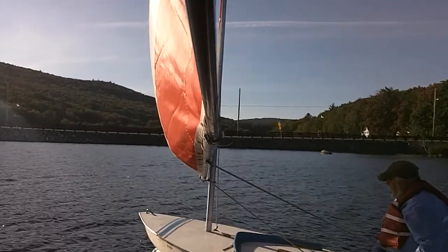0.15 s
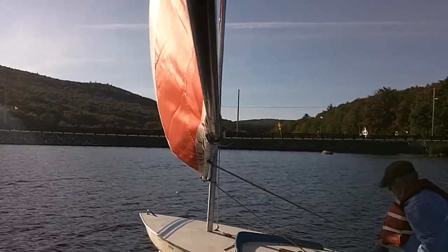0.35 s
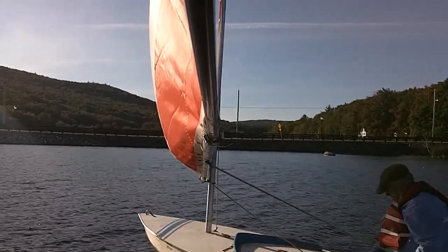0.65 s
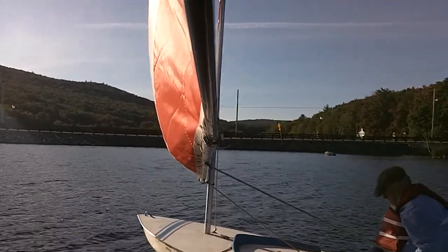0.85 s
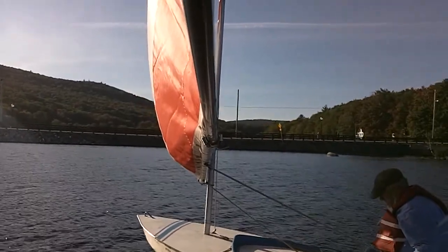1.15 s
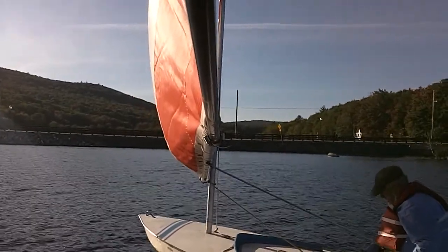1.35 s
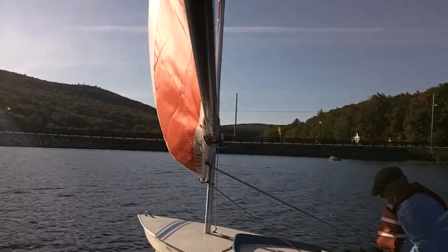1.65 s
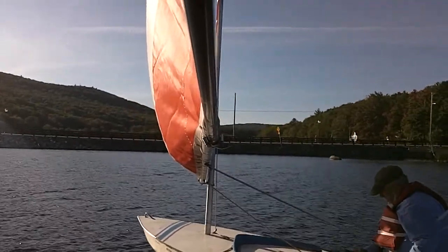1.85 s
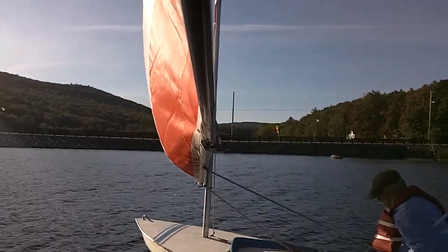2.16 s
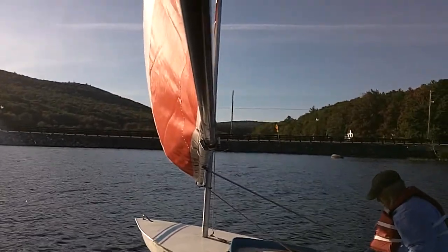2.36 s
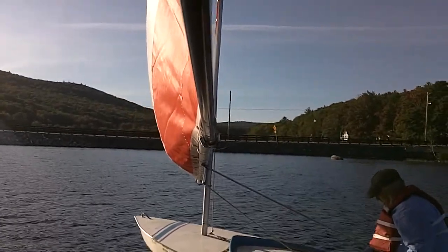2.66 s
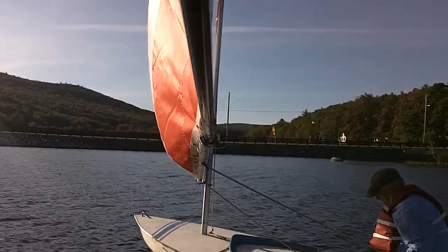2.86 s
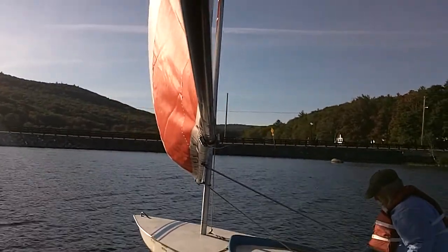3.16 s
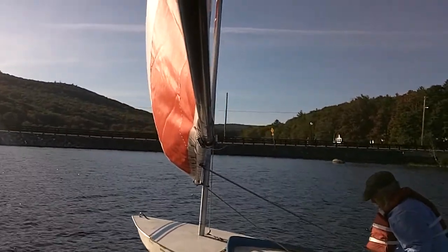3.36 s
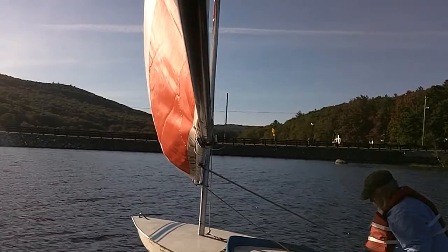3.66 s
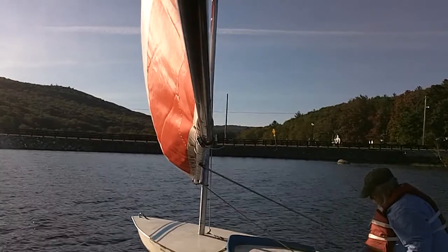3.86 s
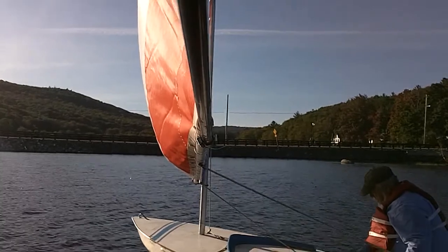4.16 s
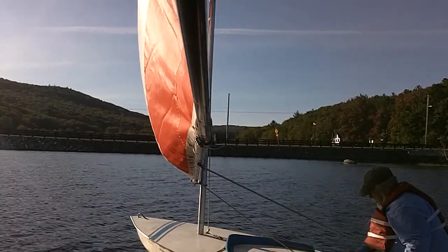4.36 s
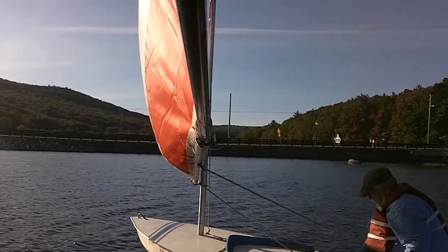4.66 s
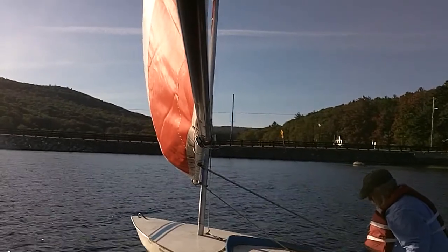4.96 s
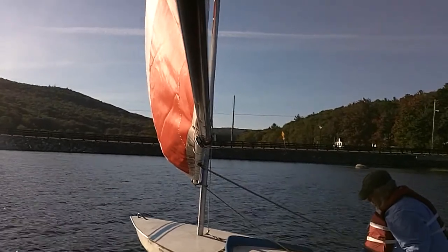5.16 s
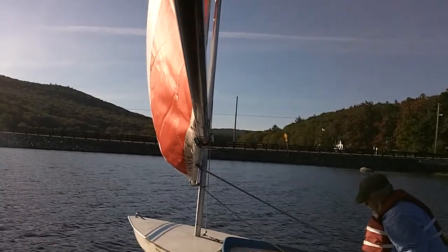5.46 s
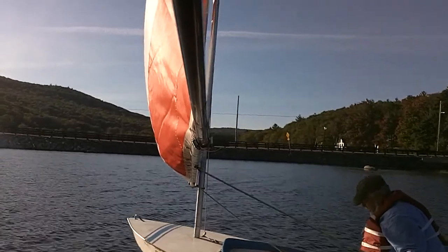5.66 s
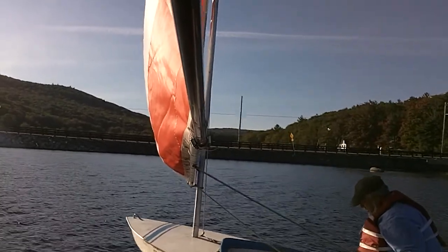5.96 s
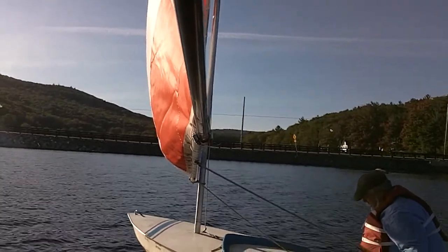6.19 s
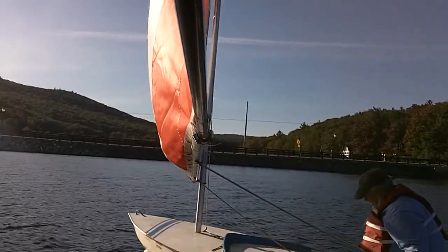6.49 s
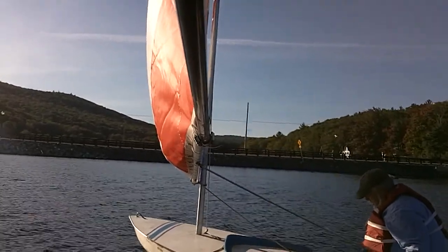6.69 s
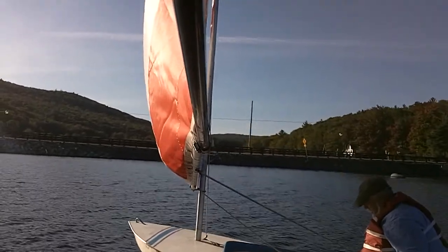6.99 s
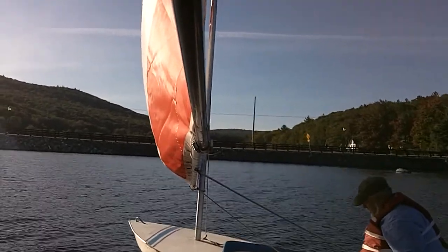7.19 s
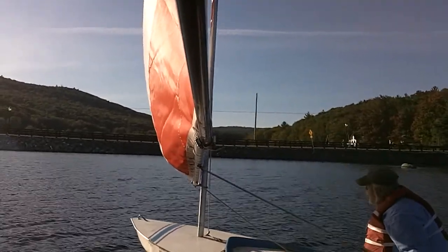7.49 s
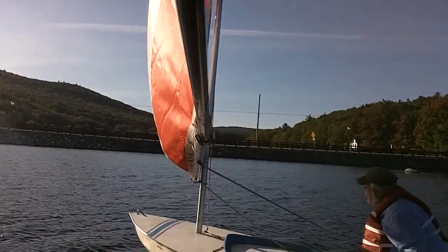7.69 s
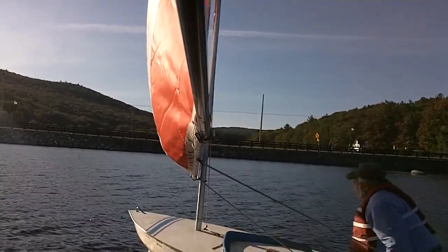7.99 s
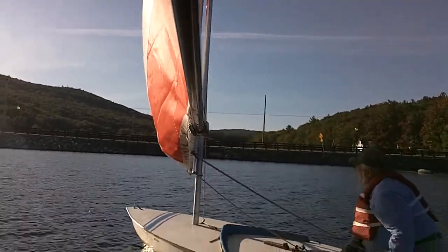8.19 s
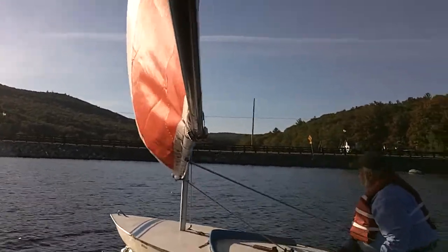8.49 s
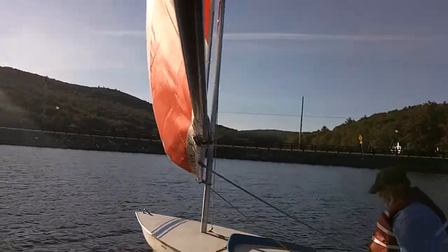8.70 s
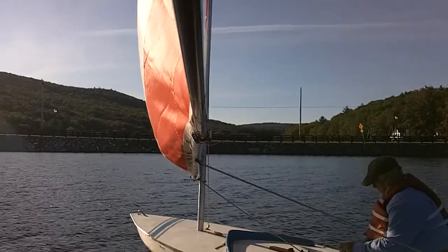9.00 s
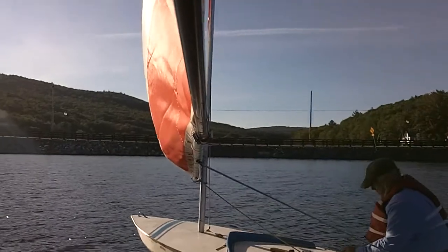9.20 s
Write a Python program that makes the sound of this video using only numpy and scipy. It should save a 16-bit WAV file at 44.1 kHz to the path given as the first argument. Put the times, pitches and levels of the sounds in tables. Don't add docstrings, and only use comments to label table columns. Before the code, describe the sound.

Close, dry outdoor sound from aboard a sailing dinghy: small wavelets lap quickly against the hull over constant gurgling and soft fizz. Glugging bubbles and crisp drops scatter throughout. Low wind rumble pushes the microphone in lumps, easing and returning, with a strong cluster around seven seconds. The flow calms mid-way, slackens briefly, then surges with heavier slosh and deeper glugs towards the end. High treble comes and goes in patches.

```python
import sys
import numpy as np
from scipy import signal
from scipy.fft import rfft, irfft, next_fast_len
from scipy.io import wavfile
from scipy.ndimage import uniform_filter1d

SR = 44100
rng = np.random.default_rng(int(sys.argv[2]) if len(sys.argv) > 2 else 0)


def gain_from_db(level_db):
    decades = np.asarray(level_db, float) / 20
    return 10 ** decades


def dump_mix(stems):
    frames = np.atleast_2d(stems).T
    limited = np.clip(frames, -1, 1)
    pcm = np.round(limited * 32767).astype(np.int16)
    wavfile.write(sys.argv[1], SR, pcm)


N = 411894
COARSE = 40


def rms_one(x):
    return x / np.sqrt(np.mean(x ** 2) + 1e-20)


def per_sample(coarse):
    return np.interp(np.arange(N) / COARSE, np.arange(len(coarse)), coarse)


def in_time(rows):
    s, *columns = np.transpose(rows)
    return [np.interp(np.arange(N) / SR, s, column) for column in columns]


def swells(s, rise_s, fall_s):
    late = np.arange(0, N, COARSE) / SR - s[:, None]
    return np.exp(-0.5 * (late / np.where(late < 0, rise_s, fall_s)) ** 2)


def drift(rate_hz):
    memory = np.exp(-2 * np.pi * rate_hz * COARSE / SR)
    noise = rng.standard_normal(N // COARSE + 2002)
    slow = signal.lfilter([1], [1, -2 * memory, memory ** 2], noise)[2000:]
    return per_sample(rms_one(slow))


def colour(x, points):
    hz, db = np.transpose(points)
    size = next_fast_len(N)
    bins = np.maximum(np.fft.rfftfreq(size, 1 / SR), 1)
    gain = gain_from_db(np.interp(np.log(bins), np.log(hz), db))
    return irfft(rfft(x, size) * gain, size)[:N]


def split(x, hz):
    low = signal.butter(4, hz, "low", fs=SR, output="sos")
    high = signal.butter(4, hz, "high", fs=SR, output="sos")
    return signal.sosfilt(low, x), signal.sosfilt(high, x)


def evened(x, share):
    swelling = uniform_filter1d(uniform_filter1d(x ** 2, size=900), size=900)
    return rms_one(x / (swelling + 1e-20) ** (share / 2))


def bubbles(start_s, height, hz, cycles, rise, size, swell_turns=1.76):
    turns = np.arange(size) / SR * hz[:, None]
    life = turns / np.maximum(cycles, 1)[:, None]
    swell = np.minimum(turns / swell_turns, 1) * np.exp(-np.log(1000) * life)
    ring = np.sin(2 * np.pi * turns * (1 + rise[:, None] * life))
    waves = height[:, None] * swell * ring
    at = (start_s * SR).astype(int)[:, None] + np.arange(size)
    return np.bincount(at.ravel(), waves.ravel(), N + size)[:N]


def swarm(low_hz, high_hz, cycles, spread_db, count, size):
    when, pitch, strength, length, climb = rng.random((count, 5)).T
    height = gain_from_db(spread_db * np.minimum(-np.log(1 - strength), 2.8))
    hz = low_hz + (high_hz - low_hz) * pitch
    return rms_one(bubbles(when * N / SR, height, hz, cycles * (0.5 + length), 0.918 * climb ** 2, size))


def hiss(low_hz, high_hz, patchy_db):
    edges = np.geomspace(low_hz, high_hz, 7)
    together = drift(34.0)
    out = 0
    for low, high in zip(edges, edges[1:]):
        band_pass = signal.butter(2, [low, high], "band", fs=SR, output="sos")
        band = signal.sosfilt(band_pass, rng.standard_normal(N))
        out = out + band * gain_from_db(patchy_db * (0.91 * together + drift(33.0)))
    return rms_one(out)


# (time [s], level [dB])
WATER_FLOW = [
    (0, -55),
    (1.0, -50.5),
    (2.1, -51.5),
    (3.2, -52),
    (4.3, -53),
    (6.0, -52),
    (6.9, -51),
    (7.6, -55),
    (8.1, -49),
    (9.34, -50.5),
]
# (time [s], gurgle rise [dB], fizz rise [dB], slosh rise [dB])
HULL_LAPS = [(.19, 6, 6.5, 8.5), (.48, 1.5, 5, -1), (.87, 3.5, 3.5, 2), (1.25, -0.5, -0.5, 2),
             (1.62, 1, 0.5, 1), (2.41, 1.5, 3, 0), (2.6, -0.5, 2.5, 2.5), (3.42, 3, 2.5, 1),
             (3.98, 4, 4, 2.5), (4.62, 1.5, 2.5, 3), (5.06, 2, 4, 2.5), (5.4, 1, 1.5, 2),
             (5.74, 1.5, 3.5, 0.5), (6.15, 1, 2, 1.5), (6.56, 1, 3, 0.5), (7.39, 1, 1.5, 5.5),
             (8.25, -2, -1, 3), (8.5, 2, 4.5, 7.5), (8.8, 1.5, 2.5, 6), (9.1, 0.5, 0, 3)]
# (pitch [Hz], level [dB])
WATER_COLOUR = [(300, -16.5), (550, -0.5), (1100, 0.5), (2000, -1.5), (3500, -3), (4900, -6.5), (5150, -15),
                (6000, -15.5), (7200, -23), (9000, -22.5), (12000, -23), (15000, -22.5)]


def wash():
    flow_db, = in_time(WATER_FLOW)
    swing_db = flow_db - flow_db.mean()
    s, *rises_db = np.transpose(HULL_LAPS)
    lap_shapes = swells(s, rise_s=0.11, fall_s=0.11)
    gurgle_lap_db, fizz_lap_db, slosh_lap_db = [per_sample(rise @ lap_shapes) for rise in rises_db]
    gurgle_db = flow_db + gurgle_lap_db
    fizz_db = -56.5 + 0.75 * swing_db + fizz_lap_db
    slosh_db = -58 + 0.68 * swing_db + slosh_lap_db

    clumps = gain_from_db(2.1 * drift(17.0))
    large = swarm(548.0, 2716, 48.8, spread_db=2.5, count=2200, size=1500)
    small = swarm(2660, 15600, 32.0, spread_db=3.0, count=10000, size=200)
    gurgle = colour(hiss(398, 2750, patchy_db=2.44) + 0.53 * clumps * large, WATER_COLOUR)
    fizz = colour(hiss(2740, 12200, patchy_db=2.0) + 0.72 * clumps * small, WATER_COLOUR)
    slosh = hiss(157.2, 481.5, patchy_db=1.94)
    return (gain_from_db(gurgle_db + 2.0) * rms_one(gurgle)
            + gain_from_db(fizz_db + 4.0) * rms_one(fizz)
            + gain_from_db(slosh_db - 1.0) * slosh)


# (time [s], buffet level [dB], extra flutter [dB])
STEADY_WIND = [(0, -38, -2.5), (.3, -43, -6), (.6, -35, -3), (1.3, -36.5, 1), (2.0, -45, -1),
               (2.5, -33.5, -0.5), (3.2, -36.5, 0.5), (4.4, -43, 0), (5.0, -36, -0.5), (5.4, -41, -1.5),
               (6.0, -37.5, 2.5), (6.6, -39, 5), (6.9, -31, 3.5), (7.6, -42.5, 3.5), (7.8, -43, 2.5),
               (8.4, -46, 8), (8.75, -38, 7), (9.34, -47.5, 6.5)]
# (time [s], peak level [dB], pitch [Hz])
WIND_PUFFS = [(0.38, -19.5, 29.7), (0.537, -25.5, 39), (0.613, -26.5, 36), (0.707, -26, 36),
              (0.848, -26, 35.8), (0.956, -26, 21), (1.181, -18, 92.5), (1.357, -28, 60.6),
              (1.674, -21.5, 45.7), (2.423, -20, 55.5), (2.574, -29, 41), (2.692, -33, 48.5),
              (2.812, -30, 31), (2.973, -28, 36), (3.126, -27, 33), (3.979, -30.5, 38), (4.989, -28, 40),
              (5.762, -28, 35), (5.957, -25.5, 33.3), (6.705, -15, 46), (6.747, -22, 39.7),
              (6.798, -21.5, 47), (6.901, -23, 45), (7.008, -22.5, 42), (7.128, -20, 42.3),
              (7.202, -19.5, 61), (7.438, -22, 35.1), (7.596, -27.5, 38.7), (7.648, -18.5, 43),
              (8.215, -24.5, 47.7)]
# (pitch [Hz], level per Hz [dB])
WIND_COLOUR = [(7.1, -10), (12, 4), (27, 11.5), (50, 0), (99, -6.5), (150, -15), (285, -27), (400, -48.5),
               (520, -79), (880, -120)]


def wind():
    breeze_db, extra_db = in_time(STEADY_WIND)
    shoves = rng.standard_normal(N) * (rng.random(N) < 70.0 / SR)
    pushes = rms_one(shoves) + 0.6 * rng.standard_normal(N)
    deep, flutter = split(colour(pushes, WIND_COLOUR), hz=72.0)
    flutter_db = -49 + extra_db + 0.36 * (breeze_db - breeze_db.mean())
    steady = gain_from_db(breeze_db) * evened(deep, share=0.2) + gain_from_db(flutter_db) * evened(flutter, share=0.58)

    s, db, hz = np.transpose(WIND_PUFFS)
    turns = (np.arange(0, N, COARSE) / SR - s[:, None]) * hz[:, None]
    phase = rng.random((len(s), 1))
    puffs = np.exp(-0.5 * (turns / 0.38) ** 2) * np.cos(2 * np.pi * (turns + phase))
    stirred_db = db - 19 - np.log2(hz / 40)
    stirred = gain_from_db(stirred_db) @ swells(s, rise_s=0.012, fall_s=0.021)
    return (steady + per_sample(gain_from_db(db - 1.5) @ puffs)
            + per_sample(stirred) * evened(flutter, share=0.52))


# (time [s], peak level [dB], pitch [Hz])
LARGE_BUBBLES = [(0.148, -27, 574), (0.604, -28.5, 850), (0.84, -28.5, 718), (1.383, -29.5, 665),
                 (2.952, -31.5, 594), (4.06, -31, 855), (4.752, -25.5, 807), (5.074, -30, 730),
                 (5.405, -31, 820), (5.521, -32, 774), (5.835, -27, 850), (6.837, -19, 970),
                 (6.922, -30, 945), (8.174, -33, 945), (8.196, -28, 875), (8.247, -22, 543),
                 (8.434, -22, 366), (9.093, -26, 850), (2.125, -33, 640), (2.465, -31, 484),
                 (2.815, -32, 830), (3.37, -31, 1000), (3.58, -34, 970), (5.77, -32, 1050),
                 (7.097, -26, 2040)]
# (time [s], peak level [dB], pitch [Hz])
SMALLER_BUBBLES = [(0.265, -30, 1310), (0.544, -28, 1033), (0.815, -22, 1200), (1.433, -29, 1060),
                   (1.561, -23, 1350), (1.794, -26.5, 1080), (1.878, -21, 1550), (1.906, -28, 1080),
                   (2.334, -29, 1150), (2.768, -25.5, 1140), (3.163, -22.5, 1420), (3.387, -9.5, 2070),
                   (3.465, -24.5, 1740), (3.717, -27.5, 1480), (3.827, -30, 1400), (4.019, -22, 1090),
                   (4.439, -27, 1730), (4.478, -26.5, 1070), (5.187, -27.5, 1160), (5.287, -26.5, 1700),
                   (6.143, -26, 1510), (6.655, -28, 1100), (7.038, -27, 1370), (7.327, -22.5, 1890),
                   (7.74, -24.5, 1560), (8.529, -24, 1170), (8.605, -28, 1610), (8.856, -23, 1500),
                   (9.011, -26.5, 1540), (9.047, -23, 1030)]
# (time [s], peak level [dB], pitch [Hz], life [cycles], pitch rise [share])
SLIDING_BUBBLES = [(.682, -27.5, 556, 90, 1.9), (1.555, -24, 620, 22, 0.063), (1.568, -33.5, 474, 140, 1.6),
                   (1.572, -24.5, 1280, 45, 0.76), (2.345, -25, 1000, 40, 0.058),
                   (4.754, -31.5, 622, 91, 0.43), (8.243, -24, 1140, 27, 0), (8.432, -22, 525, 29, 0.23),
                   (8.46, -26, 573, 47, 0.13), (8.487, -32, 850, 94, 0.33), (8.75, -32.5, 540, 93, 0.25),
                   (8.765, -27, 820, 42, 0.25), (9.235, -33.5, 623, 96, 0.41), (5.315, -30, 1850, 50, 0.16),
                   (5.525, -30, 1420, 80, 0.84), (5.915, -35, 545, 91, 0.79), (5.985, -32, 542, 60, 0.77),
                   (6.165, -38, 490, 70, 0.64), (6.345, -35, 427, 65, 0.57), (6.41, -34, 835, 78, 0.15),
                   (6.57, -31, 782, 64, .2), (6.185, -27, 2150, 53, 0.35), (6.96, -36, 505, 66, 0.48),
                   (9.165, -29.5, 947, 80, 1.1)]


def gurgles():
    rows = []
    for s, db, hz in list(LARGE_BUBBLES) + list(SMALLER_BUBBLES):
        cycles = 41.3 - 1.55 * (db + 23.5)
        rows.append((s, db, hz, cycles, 0.25))
    s, db, hz, cycles, rise = np.transpose(rows + list(SLIDING_BUBBLES))
    return bubbles(s, gain_from_db(db - 8.5), hz * 0.954, cycles, rise, size=5000)


# (time [s], peak level [dB], pitch [Hz])
DROP_TICKS = [(0.3383, -24, 3780), (0.376, -25, 3320), (0.4853, -27, 4900), (0.497, -21.5, 3200),
              (0.5175, -26, 3340), (0.7, -20.5, 3350), (0.756, -23.5, 3380), (0.854, -22.5, 3610),
              (0.9523, -24.5, 4840), (1.282, -22, 2880), (1.6914, -26.5, 3560), (2.0643, -25, 3260),
              (2.3473, -24, 3870), (2.378, -19, 3660), (3.2229, -22.5, 3870), (3.8857, -22, 3350),
              (4.02, -26, 3890), (5.711, -22, 4260), (6.1656, -24, 3840), (6.246, -22.5, 3620),
              (7.0042, -19.5, 3950), (7.023, -24, 3520), (7.0345, -24, 4030), (7.383, -24, 3720),
              (8.3042, -25.5, 3480), (8.4318, -21, 4250), (8.704, -23, 3840), (8.776, -24.5, 3300),
              (8.9226, -23, 4600), (9.0932, -23, 2950)]


def ticks():
    s, db, hz = np.transpose(DROP_TICKS)
    same = np.ones(len(s))
    ring = bubbles(s, gain_from_db(db + 7.0), hz, 9.1 * same, 0.052 * same, size=400, swell_turns=2.4)
    crack = bubbles(s, gain_from_db(db - 19.5), 2.36 * hz, 24.0 * same, 0.22 * same, size=100, swell_turns=0.89)
    return ring + crack


# (time [s], peak level [dB])
SPRAY_SPITS = [(0.4085, -65), (0.9462, -41), (1.0535, -62), (1.3618, -37), (2.6274, -70), (4.0188, -53),
               (4.675, -42), (4.8489, -50), (5.017, -69), (5.7843, -66), (7.0045, -62), (7.3682, -58)]


def spray():
    s, db = np.transpose(SPRAY_SPITS)
    same = np.ones(len(s))
    return bubbles(s, gain_from_db(db + 9), 10200 * same, 14.0 * same, 0.2 * same, size=100, swell_turns=0.7)


def scene():
    return (wash() + wind() + gurgles() + ticks() + spray())[None]


# (pitch [Hz], width [Hz])
HOUSING_NOTCHES = [
    (2702, 1017),
    (5502, 550),
    (7900, 1200),
    (10906, 1470),
]


def housing(x):
    for hz, width_hz in HOUSING_NOTCHES:
        x = signal.lfilter(*signal.iirnotch(hz, hz / width_hz, SR), x)
    return x


# (rumble over fizz [dB], highest pitch kept [Hz])
TREBLE_LIMITS = [
    (-99, 15500),
    (12.5, 10900),
    (16.5, 6900),
    (20, 5040),
]
# (pitch [Hz], luck needed to sound [0 to 1, above 1 always silent])
TREBLE_DROPOUTS = [(5300, 0.035), (7200, 0.3), (7500, 0.65), (8200, 0.66), (8500, 0.52), (10400, 0.38),
                   (11000, 0.61), (12500, 0.5), (14900, 0.45), (15300, 1.1)]


def treble_gate(x, patch_hz, sparse):
    shape = dict(fs=SR, window="cosine", nperseg=2048, noverlap=1024)
    hz, at_s, cells = signal.stft(x, **shape)
    power = np.abs(cells[0]) ** 2 + 1e-20
    rumble = power[(hz > 35) & (hz < 300)].sum(axis=0)
    fizz = power[(hz > 3000) & (hz < 5000)].sum(axis=0)
    memory = 0.48
    load_db = signal.lfilter([1 - memory], [1, -memory], 10 * np.log10(rumble / fizz))
    load_db = load_db + 0.97 * rng.standard_normal(len(at_s))
    steps_db, top_hz = np.transpose(TREBLE_LIMITS)
    kept_hz = top_hz[np.searchsorted(steps_db, load_db) - 1]

    loudest = np.array(sorted(DROP_TICKS, key=lambda tick: -tick[1]))[:8, 0]
    sharp_s = np.append(loudest, np.transpose(SPRAY_SPITS)[0])
    kept_hz[np.round(sharp_s * SR / 1024).astype(int)] = top_hz.max()

    patch = (hz / patch_hz).astype(int)
    luck, edge = rng.random((2, 60, len(at_s)))
    share = np.interp(hz, *np.transpose(TREBLE_DROPOUTS), left=0)[:, None]
    in_reach = hz[:, None] < kept_hz * (0.95 + 0.12 * edge[0])
    lucky = 0.5 * luck[patch] + 0.5 * edge[1] > share
    thinned = rng.random(cells.shape[1:]) > sparse * (share > 0.05)
    return signal.istft(cells * (in_reach & lucky) * thinned, **shape)[1][:, :N]


def band_limit(x):
    return signal.sosfilt(signal.butter(12, 15620, fs=SR, output="sos"), x)


def record(dry):
    mix = treble_gate(housing(dry), patch_hz=850, sparse=0.11)
    return band_limit(mix)


dry = scene()
out = record(dry)
dump_mix(out)
```